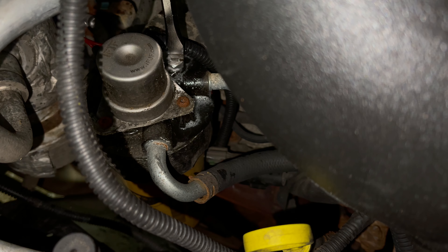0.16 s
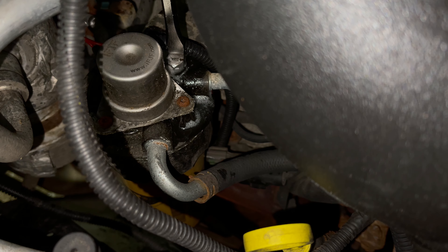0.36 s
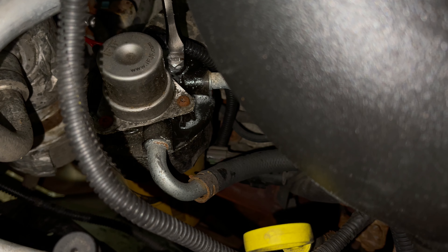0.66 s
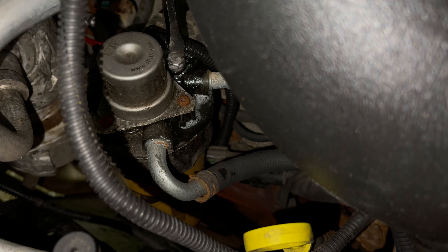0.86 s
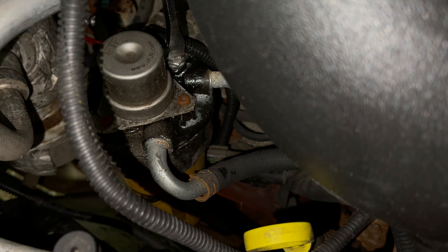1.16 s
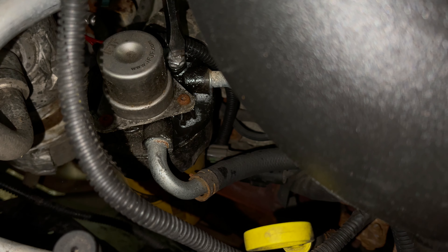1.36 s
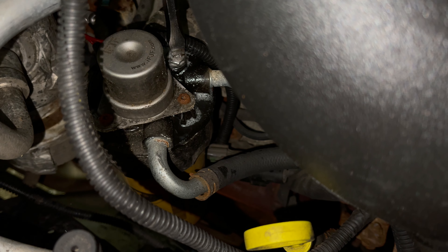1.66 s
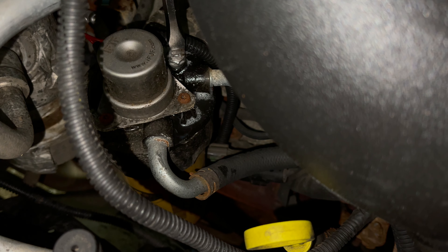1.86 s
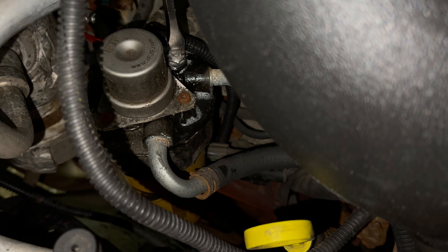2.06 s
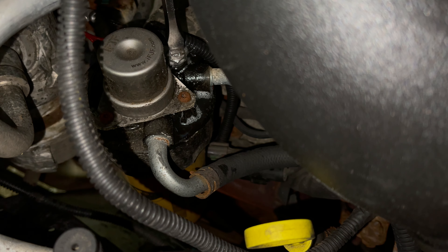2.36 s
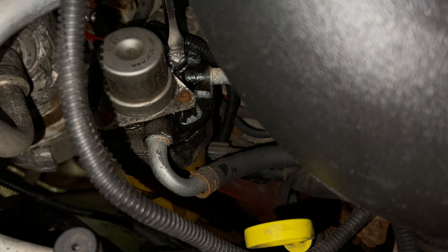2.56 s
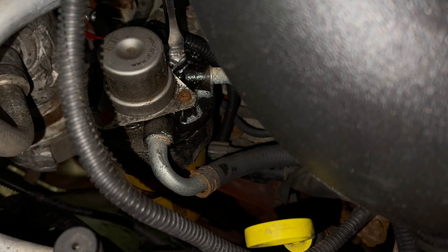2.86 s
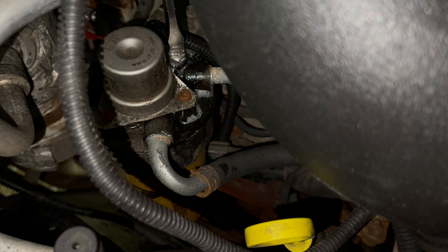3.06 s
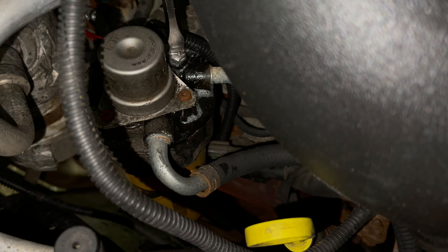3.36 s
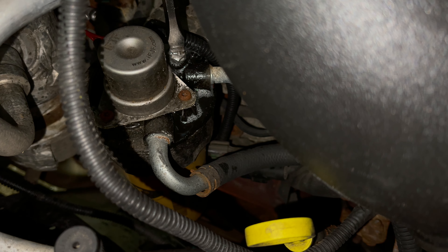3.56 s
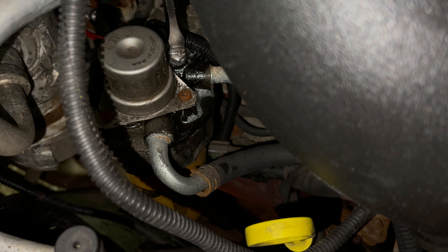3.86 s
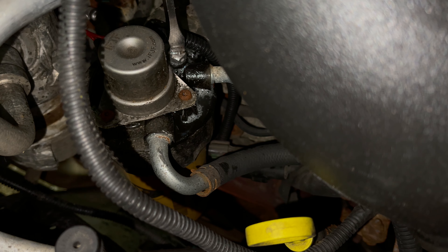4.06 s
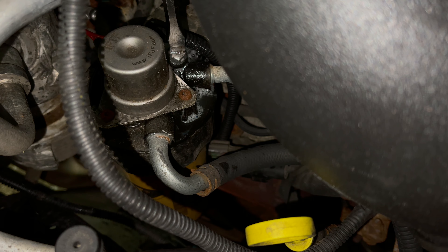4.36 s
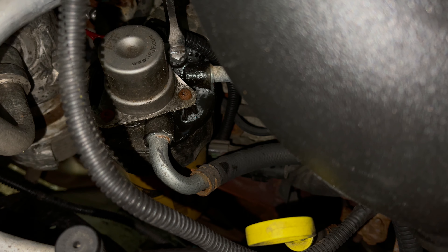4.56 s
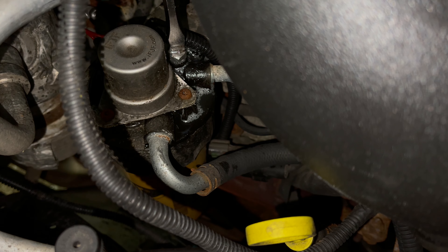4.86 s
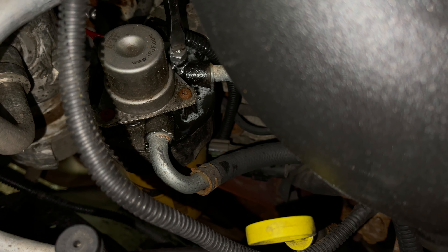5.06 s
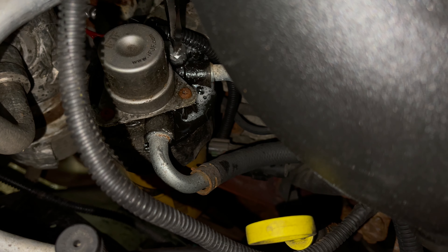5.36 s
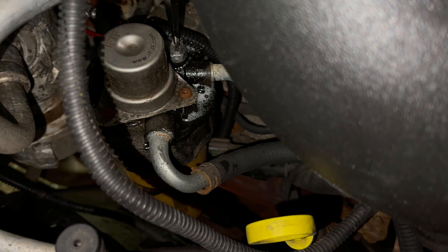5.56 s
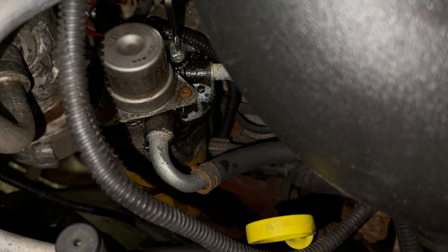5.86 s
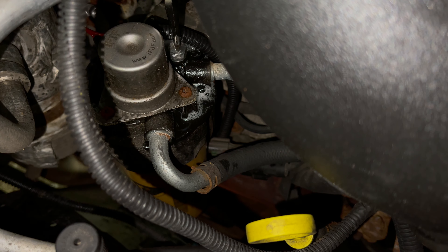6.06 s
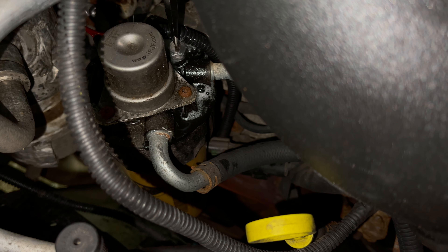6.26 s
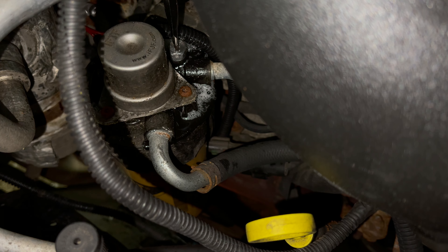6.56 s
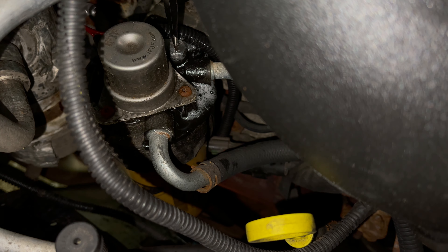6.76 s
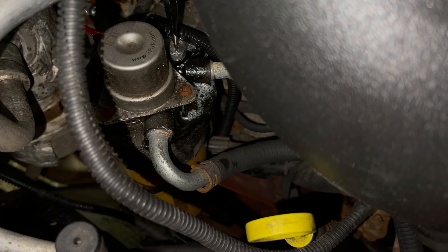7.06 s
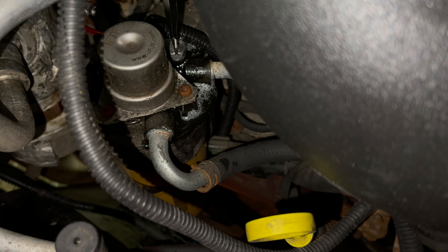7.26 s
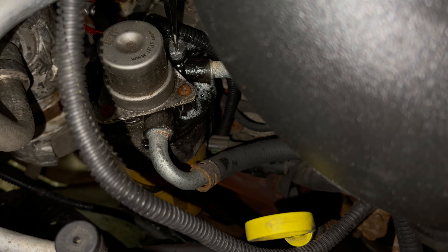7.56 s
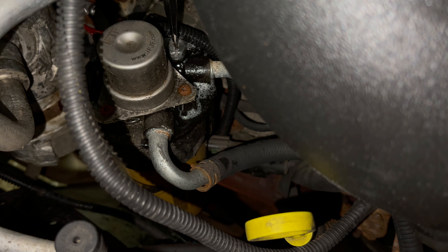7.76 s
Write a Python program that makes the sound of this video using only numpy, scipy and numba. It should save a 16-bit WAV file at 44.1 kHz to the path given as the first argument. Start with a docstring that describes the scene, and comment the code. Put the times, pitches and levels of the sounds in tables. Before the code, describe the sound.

Irregular crackling hisses of air and frothy fuel escape a fitting beside a metal pump, some gliding up to dry hiss, others down to wet squelch. After an early flurry there is a lull with leaking air, then a long busy run of spits, bubbles and hollow hose gulps. The spitting fades to a few ticks over constant pump drone and whine, before a dull knock and slightly faster pump. Near, dry stereo sound under a bonnet.

```python
"""Air spits and hisses at a loosened fuel fitting in an engine bay, over the whine of an electric pump.
Each spit is a noise jet with bubbling spray and splutter, and a squelch whose resonance glides: up from wet
froth to a dry hiss, down as fuel returns. Lone bubbles pop as short bursts; the hose gulps with falling tones.
Once the air is out, the fuel runs quietly with a few ticks. Near the end a knock sounds and the pump,
a set of sines locked to its shaft over casing resonances and rushing noise, speeds up a little."""
import sys
import numpy as np
from scipy import signal
from scipy.fft import rfft, irfft, next_fast_len
from scipy.io import wavfile
from numba import njit

SR = 44100
rng = np.random.default_rng(int(sys.argv[2]) if len(sys.argv) > 2 else 0)


def log_audio(samples):
    """Write samples as a 16-bit WAV file to the path given in sys.argv[1]."""
    # one column per channel
    frames = np.atleast_2d(samples).T
    # limit to full scale, then quantise
    limited = np.clip(frames, -1, 1)
    pcm = np.round(limited * 32767).astype(np.int16)
    wavfile.write(sys.argv[1], SR, pcm)


N = 348875
TIME = np.arange(N) / SR
AGE = TIME[:SR // 5]   # time since a burst began
SIZE = next_fast_len(N + SR // 4)   # room for the reflections
FREQS = np.maximum(np.arange(SIZE // 2 + 1) * SR / SIZE, 1)
CUTOFF_HZ = 15800   # top of the sound


# colours of the three parts of a spit, air jet, spray and splutter: (f/Hz, relative level/dB)
JET_COLOUR = [(6800, -22), (7500, -7), (8200, 1), (8500, -0.5), (9000, 1.5), (9500, 7), (9950, 2.5),
              (10500, 0.5), (10900, -5.5), (11600, -6.5), (12400, -16), (13500, -22), (15500, -30.5),
              (16500, -21)]
SPRAY_COLOUR = [(3700, -19.5), (4300, -11.5), (4800, 2.5), (5150, -4.5), (5600, 0.5), (6300, -1), (7000, 0),
                (7700, -26), (8500, -47)]
SPLUTTER_COLOUR = [(400, -17), (1050, 3.5), (1400, -3), (1700, -22), (2050, 4.5), (2350, -9.5), (2600, 2),
                   (2850, -3.5), (3080, 9), (3220, -2.5), (3360, 10), (3650, -2.5), (4100, -1), (4800, -70)]
# colour that the metal around the gap gives the squelch: (f/Hz, relative level/dB)
SQUELCH_COLOUR = [(1500, 5.5), (2050, 7), (2350, -6), (2850, 2.5), (3080, 7.5), (3220, 0.5), (3360, 2.5),
                  (3700, -5.5), (4100, -6), (4800, 6), (5150, -2), (5600, 1), (7300, -2.5), (8200, 5),
                  (9000, -1), (9600, 13), (10200, 9), (11000, 5), (12500, -3), (13500, 4)]


def fitting():
    """Air hisses out as a jet, tears the fuel into bubbling spray, and splutters and squelches in the wet gap."""
    jet, spray, splutter = outflow()
    bubbling = from_db(-5) * spray * bubbles(cycles=7.3, size_db=10)
    jet = jet * fizz(bursts_per_s=2500, burst_share=0.2, flutter_db=2.5, flutter_rate=62)
    spray = spray * fizz(bursts_per_s=1200, burst_share=0.6, flutter_db=1.5, flutter_rate=20)
    splutter = splutter * fizz(bursts_per_s=600, burst_share=0.42, flutter_db=3.5, flutter_rate=9.5)
    spray = gurgle(spray, path_s=0.00057, swing=0.292, rate=7.0, depth=0.6)
    splutter = gurgle(splutter, path_s=0.000733, swing=0.48, rate=12.6, depth=0.34)
    froth = squelch(q=2.03, waver=0.043, waver_rate=52, attack_s=0.0026, release_s=0.0058)
    mix = from_db(-2.5) * coloured(jet, JET_COLOUR)
    mix += from_db(0.1) * coloured(froth, SQUELCH_COLOUR)
    mix += rfft(bubbling, SIZE)
    mix += from_db(0.54) * coloured(spray, SPRAY_COLOUR)
    mix += from_db(-0.3) * coloured(splutter, SPLUTTER_COLOUR)
    return spread(mix)


# spits of air and frothy fuel; the froth rings low when the gap is wet and high when it is blown clear;
# levels are set before colour and mix:
# (t/s, length/s, air jet level/dB, spray level/dB, squelch level/dB, squelch start f/Hz, squelch end f/Hz)
SPITS = [(0.01, 0.025, -26.5, -41.5, -38, 8600, 7980), (0.033, 0.054, -23.5, -40, -26, 4860, 8600),
         (0.087, 0.015, -18.5, -38, -22, 8900, 9700), (0.117, 0.076, -29, -41, -36.5, 2600, 3680),
         (0.185, 0.054, -26.5, -41.5, -39, 6000, 9900), (0.242, 0.067, -29, -43, -29.5, 9650, 11900),
         (0.375, 0.028, -26, -36, -34, 4540, 10100), (0.401, 0.11, -23.5, -43, -29, 10200, 11500),
         (0.516, 0.11, -27, -42, -35, 9500, 10600), (0.692, 0.066, -46, -48, -36, 2200, 3300),
         (0.745, 0.038, -33, -50, -45, 8000, 9200), (1.312, 0.013, -43, -44, -30, 5960, 8400),
         (1.344, 0.0091, -50, -45, -34.5, 3500, 5500), (1.377, 0.064, -31.5, -52, -36.5, 3200, 9000),
         (2.22, 0.014, -52.0, -57, -41, 3100, 2700), (2.25, 0.018, -42, -43.5, -35.5, 2550, 3900),
         (2.283, 0.076, -30.0, -42.5, -31, 3900, 9700), (2.399, 0.046, -24.5, -39, -29.5, 7300, 5000),
         (2.443, 0.034, -44, -48, -37, 3730, 2830), (2.521, 0.036, -39, -45.5, -35.5, 2920, 5300),
         (2.544, 0.064, -30.5, -43, -32, 8950, 11500), (2.61, 0.013, -23.5, -44, -28, 10500, 11800),
         (2.645, 0.018, -43, -45, -29.5, 3320, 3680), (2.668, 0.01, -33, -38, -41, 3500, 6000),
         (2.692, 0.04, -29.5, -40.5, -34, 3320, 5540), (2.72, 0.049, -28.5, -44, -39, 5000, 3340),
         (2.772, 0.064, -28.5, -43, -36, 8100, 9200), (2.842, 0.047, -22.5, -40, -25, 9900, 7700),
         (2.992, 0.036, -23.5, -39, -30, 10000, 11500), (3.035, 0.06, -23, -42, -25.5, 10600, 7600),
         (3.133, 0.035, -23, -40, -33, 4450, 10000), (3.167, 0.065, -24.5, -43.5, -33, 10200, 7460),
         (3.241, 0.011, -33, -40.5, -33, 4000, 3200), (3.286, 0.028, -31, -39, -32.5, 3100, 3800),
         (3.319, 0.09, -27.5, -45.5, -34, 8300, 11200), (3.416, 0.023, -21, -41.5, -30, 5860, 4560),
         (3.439, 0.042, -30, -43.5, -30.5, 6000, 10600), (3.569, 0.028, -30, -41, -32, 5840, 4670),
         (3.628, 0.031, -27.5, -42, -33.5, 4330, 7050), (3.652, 0.041, -26, -44, -31, 8500, 12000),
         (3.744, 0.0047, -25, -38, -27.5, 5500, 3800), (3.766, 0.034, -22, -40.5, -26.5, 5470, 9800),
         (3.809, 0.02, -22.5, -44.5, -29, 11500, 7000), (3.837, 0.037, -29.5, -41, -34, 5750, 4440),
         (3.893, 0.038, -33, -48.0, -35.5, 2840, 3000), (3.934, 0.024, -26.5, -45, -40, 8000, 8800),
         (4.041, 0.063, -27, -43.5, -32.5, 4400, 6060), (4.185, 0.022, -22.5, -42, -24, 5370, 9500),
         (4.21, 0.026, -24, -40.5, -28, 9500, 6400), (4.252, 0.015, -23.5, -41.5, -35, 5460, 6950),
         (4.301, 0.023, -34, -51, -33.5, 3200, 3250), (4.336, 0.0082, -41, -46, -32.5, 3200, 3320),
         (4.39, 0.043, -34, -46, -37, 3000, 3740), (4.397, 0.016, -40, -36, -31, 7000, 8000),
         (4.449, 0.012, -27.5, -41.5, -29.5, 7800, 5950), (4.5, 0.027, -40, -51, -40, 2700, 2900),
         (4.522, 0.03, -31, -39.5, -32.5, 3000, 3270), (4.608, 0.0062, -35, -40, -43, 3000, 3870),
         (4.651, 0.048, -29.5, -42.5, -33.5, 5240, 4700), (4.893, 0.059, -32, -42.5, -42, 4000, 5000),
         (4.965, 0.031, -29, -41, -36.5, 4530, 5160), (5.022, 0.012, -43, -42, -38, 2960, 3160),
         (5.087, 0.0065, -38, -44, -29.5, 3600, 2800), (5.111, 0.048, -40, -51, -40.5, 3400, 3050),
         (5.149, 0.02, -27.5, -43.5, -53, 6000, 9100), (5.305, 0.0089, -47, -58, -33.5, 2770, 3430),
         (5.309, 0.031, -28, -43, -48, 7500, 10200), (6.124, 0.066, -48, -56, -45, 8200, 8850),
         (6.142, 0.013, -41, -44, -39, 3000, 5970), (6.164, 0.006, -50.5, -58, -39, 2780, 4200),
         (6.189, 0.0054, -51, -43, -41, 3000, 4900)]
# lone air bubbles popping at the gap: (t/s, jet level/dB before the mix)
POPS = [(0.252, -20), (0.329, -21), (0.681, -25.5), (1.757, -24), (2.196, -22), (2.905, -25.5),
        (2.956, -19), (3.118, -19), (3.531, -26.5), (3.545, -27.5), (3.71, -32), (3.73, -19),
        (4.135, -24.5), (4.841, -25.5), (5.032, -29), (5.231, -29.5), (6.149, -30), (6.192, -40)]
# a longer leak of air, rising and sinking: (t/s, base level/dB)
LEAK = [(0.76, -34), (0.785, -33), (0.85, -37.5), (0.97, -49.5), (1.038, -35.5), (1.142, -43), (1.778, -33),
        (1.794, -38), (2.13, -34), (2.19, -41)]
# froth that seeps between the spits: (t/s, base level/dB)
FROTH = [(0, -49.5), (2.5, -48.5), (4.2, -51), (5.1, -59), (5.35, -55), (5.5, -85), (7.9, -84)]
# jet, spray and splutter in dB relative to those base levels
LEAK_PARTS_DB, FROTH_PARTS_DB = (6, -11.5, -23), (2.5, -6, -6)


def outflow():
    """Strength of jet, spray and splutter: seeping froth and the long leak, with spits and pops on top."""
    froth_db, leak_db = in_time(FROTH)[0], in_time(LEAK)[0]
    leaking = (TIME > LEAK[0][0]) & (TIME < LEAK[-1][0])
    power = from_db([froth_db + db for db in FROTH_PARTS_DB]) ** 2
    power += leaking * from_db([leak_db + db for db in LEAK_PARTS_DB]) ** 2
    for s, length, jet_db, spray_db, *_ in SPITS:
        levels_db = (jet_db, spray_db, spray_db - 1)   # splutter just under the spray
        add_burst(power, s, length, levels_db, attack_s=0.0037, release_s=0.0056)
    for s, db in POPS:
        levels_db = (db, db - 18.5, db - 21)
        add_burst(power, s, 0.004, levels_db, attack_s=0.0021, release_s=0.0045)
    return np.sqrt(power)


def add_burst(power, s, length, levels_db, attack_s, release_s):
    """Add the power of one burst to jet, spray and splutter."""
    shape = gate(length, attack_s, release_s)
    at = int(s * SR)
    for part, db in zip(power, levels_db):
        part[at:at + len(AGE)] += (shape * from_db(db)) ** 2


def gate(length, attack_s, release_s):
    """Envelope of one burst: linear attack, hold, exponential release."""
    return np.minimum(AGE / attack_s, 1) * np.exp(-np.maximum(AGE - length, 0) / release_s)


def fizz(bursts_per_s, burst_share, flutter_db, flutter_rate):
    """Three parts of turbulence and bursting bubbles, fluttering together as droplets choke the gap; rms 1."""
    heights = np.exp(0.45 * np.minimum(rng.exponential(1, (3, N)), 4))
    signs = rng.choice([-1, 1], (3, N))
    bursts = rms_one(heights * signs * (rng.random((3, N)) < bursts_per_s / SR))
    turbulence = rng.standard_normal((3, N))
    mix = np.sqrt(burst_share) * bursts + np.sqrt(1 - burst_share) * turbulence
    return rms_one(mix * from_db(flutter_db * drift(flutter_rate)))


def squelch(q, waver, waver_rate, attack_s, release_s):
    """Bursting froth rings in one resonance that glides and wavers through each spit."""
    out = np.zeros((3, N + SR))
    froth = fizz(bursts_per_s=980, burst_share=0.61, flutter_db=2.0, flutter_rate=37)
    unsteady = np.exp(waver * drift(waver_rate))
    for s, length, _, _, db, start_hz, end_hz in SPITS:
        at = int(s * SR) + np.arange(len(AGE))
        glide = start_hz * (end_hz / start_hz) ** np.minimum(AGE / length, 1)
        hz = np.minimum(glide * unsteady[at], CUTOFF_HZ)
        # a narrower band passes less noise, so lift it
        gain = from_db(db) * gate(length, attack_s, release_s) * np.sqrt(2 * q * SR / (np.pi * hz))
        for part, source in zip(out, froth):
            once = moving_resonance(source[at], hz, q)
            part[at] += gain * moving_resonance(once, hz, q)
    return out[:, :N]


@njit
def moving_resonance(x, hz, q):
    """Band-pass with a moving centre and gain 1 on top."""
    out, band, low = np.zeros(len(x)), 0., 0.
    for i in range(len(x)):
        g = np.tan(np.pi * hz[i] / SR)
        v = (band + g * (x[i] - low)) / (1 + g * (g + 1 / q))
        band, low = 2 * v - band, low + 2 * g * v
        out[i] = v / q
    return out


BUBBLES_PER_S, BUBBLE_LOW_HZ, BUBBLE_HIGH_HZ = 420, 1898, 6970


def bubbles(cycles, size_db):
    """Bubbles of many sizes burst in the spray, each ringing briefly at its own pitch; rms 1."""
    out = np.zeros((3, N + SR))
    age = TIME[:SR // 50]
    for when, pitch, size, part in rng.random((int(BUBBLES_PER_S * N / SR), 4)):
        hz = BUBBLE_LOW_HZ * (BUBBLE_HIGH_HZ / BUBBLE_LOW_HZ) ** pitch
        at = int(when * N)
        tone = np.sin(2 * np.pi * hz * age) * np.exp(-age * hz / cycles)
        out[int(part * len(out)), at:at + len(age)] += from_db(size_db * size) * np.sqrt(hz) * tone
    return rms_one(out[:, :N])


def gurgle(parts, path_s, swing, rate, depth):
    """A reflection from the moving fuel surface makes the resonances wander."""
    earlier = TIME - path_s * np.exp(swing * drift(rate))
    reflected = np.array([np.interp(earlier, TIME, part) for part in parts])
    return (parts + depth * reflected) / np.sqrt(1 + depth ** 2)


# gulps in the hose, mostly as a spit is cut off: (t/s, peak level/dB before roughness and hose)
GULPS = [(0.210, -30), (0.309, -28.5), (0.523, -28.5), (0.624, -30), (2.358, -25), (2.439, -31.5),
         (2.704, -28), (2.89, -30.5), (3.047, -33), (3.085, -33), (3.216, -30.5), (3.488, -27),
         (3.594, -28), (3.692, -31.5), (3.826, -31), (3.956, -27.5), (4.094, -29), (4.232, -28.5),
         (4.422, -29), (4.698, -27.5), (7.580, -33)]


def gulps(glide_s, swell_s, lowest_hz, rough_db):
    """An air pocket rings roughly, lower and lower as it grows in the hose."""
    out, age = np.zeros(N + SR), TIME[:SR // 10]
    swell = (age / swell_s * np.exp(1 - age / swell_s)) ** 2
    for (s, db), size in zip(GULPS, rng.standard_normal(len(GULPS))):
        start_hz = 400 * np.exp(0.08 * size)
        pitch = lowest_hz + (start_hz - lowest_hz) * np.exp(-age / glide_s)
        tone = np.sin(2 * np.pi * np.cumsum(pitch) / SR)
        out[int(s * SR) + np.arange(len(age))] += from_db(db) * swell * tone
    return out[:N] * rms_one(from_db(rough_db * drift(126)))


# drops of fuel and small bubbles; the splash level is set before its filter:
# (t/s, ring level/dB, splash level/dB, ring f/Hz, splash centre f/Hz)
DROPS = [(0.125, -38, -46, 1040, 3000), (0.25, -34.5, -53, 997, 3000), (4.782, -42, -33.5, 3020, 6130),
         (5.271, -51, -32.5, 3050, 5000), (5.421, -53, -40, 3370, 8300), (5.6, -62, -45, 3280, 7000),
         (5.780, -50, -41, 3030, 6000), (6.314, -43, -40.5, 3090, 5500), (6.381, -57, -49, 3400, 4500),
         (6.392, -60, -37.5, 8300, 8800), (6.575, -55, -45, 3050, 6000), (6.709, -52, -43, 2500, 4000),
         (6.869, -49, -48, 3000, 6000), (7.393, -49, -52, 2950, 3500), (7.641, -50, -43, 4000, 6500),
         (7.675, -38.5, -48, 2100, 6000), (7.736, -41, -42, 9000, 9000)]


def drops(ring_cycles, splash_s, splash_width_hz):
    """A drop lands with a tiny, broad splash and rings for a few cycles."""
    out, age = np.zeros(N + SR), TIME[:SR // 10]
    for s, ring_db, splash_db, hz, splash_hz in DROPS:
        tone = from_db(ring_db) * np.sin(2 * np.pi * hz * age) * np.exp(-age * hz / ring_cycles)
        splash = from_db(splash_db) * rng.standard_normal(len(age)) * np.exp(-age / splash_s)
        out[int(s * SR) + np.arange(len(age))] += tone + ring(splash, splash_hz, splash_width_hz)
    return out[:N]


# a thin whistle comes and goes during the long leak: (t/s, length/s, level/dB)
WHISTLES = [(0.76, 0.12, -58), (1.13, 0.088, -56), (1.49, 0.11, -56), (1.86, 0.1, -59)]


def whistle(attack_s, release_s):
    """A thin tone of fixed pitch that swells and fades a few times."""
    level = np.zeros(N + SR)
    for s, length, db in WHISTLES:
        level[int(s * SR) + np.arange(len(AGE))] += from_db(db) * gate(length, attack_s, release_s)
    return level[:N] * np.sin(2 * np.pi * 1565 * TIME)


# pump speed: (t/s, turns per s)
SPEED = [(0, 49.9), (.5, 49.92), (.8, 50.12), (1.8, 50.07), (2.5, 49.87), (4.5, 49.77), (5.6, 49.58),
         (6.2, 49.72), (7.57, 49.82), (7.595, 50.72), (7.9, 50.92)]
# pump load: (t/s, casing drone level/dB before the mix, whine level/dB, lift of the motor lines/dB)
PUMP = [(0, -49.5, -51.5, 0), (0.5, -49.5, -53.5, 3.5), (1.9, -50.5, -53, 4.5), (2.4, -50.5, -51.5, 0.5),
        (4.6, -44, -48.5, 2), (5.5, -46, -53, 1.5), (7.54, -47, -50, 1.5), (7.6, -49.5, -45.5, 1),
        (7.9, -46, -45.5, 3)]
# share of the air purged from the line: (t/s, share 0-1)
AIR_GONE = [(2.2, 0.055), (5.0, 0.85)]
# lines of the whine: (multiple of the speed, level/dB re whine, flutter/dB)
WHINE = [(16, 2, -0.5), (17, -12.5, 6)]
# fainter motor lines: (multiple of the speed, level/dB before lift, flutter/dB, change at full air/dB)
MOTOR = [(4, -60.5, 5.5, -1), (20, -67.5, 5.5, -4.5), (30, -64, 1.5, 1.5), (31, -70, 0, -10),
         (36, -68.5, -1, 2), (37, -68, 4, 2.5), (40, -63.5, 2.5, -8.5)]


def pump_lines():
    """The vanes and the commutator sing at multiples of the slightly unsteady shaft speed."""
    turns = np.cumsum(in_time(SPEED)[0] * (1 + 0.00138 * drift(6.5))) / SR
    _, whine_db, lift_db = in_time(PUMP)
    air = 1 - in_time(AIR_GONE)[0]

    def line(multiple, db, flutter_db):
        """A fluttering sine locked to the shaft."""
        flutter = rms_one(from_db(flutter_db * drift(17.0)))
        sine = np.sqrt(2) * np.sin(2 * np.pi * (multiple * turns + rng.random()))   # rms 1
        return from_db(db) * flutter * sine

    whine = sum(line(multiple, whine_db + db, flutter_db) for multiple, db, flutter_db in WHINE)
    motor = sum(line(multiple, lift_db + db + air * air_db, flutter_db)
                for multiple, db, flutter_db, air_db in MOTOR)
    return whine + motor


# resonances of the pump casing: (f/Hz, width/Hz, level/dB re one another)
CASING = [(731.6, 73, 8), (1830, 52, -5.5), (5330, 530, -15.5), (5506, 88, -13.5)]
# colour of the fuel rushing through the pump: (f/Hz, relative level/dB)
RUSH_COLOUR = [(250, -2), (480, 3), (590, 3.5), (880, -1.5), (1150, -7.5), (1600, -7), (2100, -9.5),
               (2500, -12.5), (3500, -20.5), (4800, -15.5), (7000, -29), (9700, -8.5), (11000, -20),
               (13500, -93)]


def pump_noise(churn_db, churn_rate, churn_below_hz, buzz_db, buzz_rate):
    """Churning fuel excites the casing resonances, over a broad rush whose low part heaves unevenly."""
    drone_db = in_time(PUMP)[0]
    modes = sum(from_db(db) * rms_one(1 / (1 + (2 * (FREQS - hz) / width) ** 2))
                for hz, width, db in CASING)
    casing = from_db(drone_db + 2.0) * diffuse(modes)
    noise = casing + from_db(-51.5) * diffuse(colour(RUSH_COLOUR))
    # the lows churn, the high casing ring flutters, the drone between them is left even
    spectrum = rfft(noise, SIZE)
    lows, highs = FREQS < churn_below_hz, FREQS > 4000
    for band, depth_db, rate in ((lows, churn_db, churn_rate), (highs, buzz_db, buzz_rate)):
        heave = rms_one(from_db(depth_db * drift(rate)))
        noise = noise + irfft(spectrum * band, SIZE)[:, :N] * (heave - 1)
    return noise


KNOCK_AT_S, KNOCK_DB, CRACK_DB = 7.578, -25.5, -27.5   # as the pump speeds up; levels before the mix


def knock(decay_s, hz, width_hz, crack_s, crack_hz, crack_width_hz):
    """A dull knock in the pump body with a sharp, broad crack: two dying noise blows, each through a resonance."""
    age = TIME - KNOCK_AT_S
    blow = (age > 0) * rng.standard_normal(N)
    dull = ring(blow * np.exp(-np.abs(age) / decay_s), hz, width_hz)
    crack = ring(blow * np.exp(-np.abs(age) / crack_s), crack_hz, crack_width_hz)
    return from_db(KNOCK_DB) * dull + from_db(CRACK_DB) * crack


# colour of the low rumble around the pump: (f/Hz, relative level/dB)
RUMBLE_COLOUR = [(15, -48), (32, -12), (42, 2), (55, -0.5), (80, -1.5), (115, -2), (160, -5), (200, -13),
                 (280, -13.5), (400, -31.5), (700, -46), (3000, -82)]


def rumble():
    """Steady low noise, nearly alike at both ports."""
    return from_db(-44.5) * diffuse(colour(RUMBLE_COLOUR))


def engine_bay(x, near_db, near_t60, far_db, far_t60):
    """Metal close around the gap colours the sound; farther reflections differ at the two ports."""
    near = 1 + from_db(near_db) * echoes(near_t60)
    far = 1 + from_db(far_db) * np.array([echoes(far_t60), echoes(far_t60)])
    return irfft(rfft(x, SIZE) * near * far, SIZE)[:, :N]


def echoes(t60):
    """Response of a dense, dying cloud of reflections with unit energy."""
    t = TIME[:SR // 4]
    tail = rng.standard_normal(len(t)) * from_db(-60 * t / t60) * (t > .0005)
    return rfft(tail / np.linalg.norm(tail), SIZE)


# the left and right microphone ports: (f/Hz, radians by which left leads), (f/Hz, left-right level/dB)
LEAD = [(100, 0.2), (350, 0.45), (750, 0.85), (1000, 0), (1350, 1.8), (1700, -.5), (3300, 0.65),
        (4200, 0.56), (5400, 0.8), (6600, 0.4), (7400, 1), (8400, 0), (10000, -2.8), (12000, -6.2),
        (15000, -11)]
TILT = [(50, -0.5), (800, 0), (1800, 0), (2300, 5), (3300, 3), (4100, 2), (4800, 4.5), (7200, 5.5),
        (8200, 0.5), (9500, 0)]


def at_ports(spectrum):
    """A spectrum as it reaches the left and right port, each with its own level and phase."""
    sides = np.array([[.5], [-.5]])
    level = from_db(sides * by_hz(TILT))
    response = level / np.sqrt(np.mean(level ** 2, axis=0)) * np.exp(1j * sides * by_hz(LEAD))
    return irfft(spectrum * response, SIZE)[:, :N]


# how alike a source is at the two ports: (f/Hz, likeness 0-1)
LIKENESS = [(100, 1), (400, 0.94), (900, 0.74), (1400, 0.039), (1900, 0.48), (2400, 0.25), (3200, 0.65),
            (4000, 0.55), (7000, 0.9), (8200, 0.89), (11000, 1)]


def spread(spectra):
    """A source from three parts: one heard at both ports, one at the left, one at the right."""
    alike = by_hz(LIKENESS)
    return at_ports(np.sqrt(alike) * spectra[0] + np.sqrt(1 - alike) * spectra[1:])


def diffuse(gain):
    """Steady stereo noise shaped by a gain over frequency."""
    return spread(rfft(rng.standard_normal((3, N)), SIZE) * rms_one(gain))


def coloured(parts, table):
    """Spectra of the parts in the colour of a table, scaled so that white noise keeps its power."""
    return rfft(parts, SIZE) * rms_one(colour(table))


def colour(table):
    """Gain at every frequency from a table in dB."""
    return from_db(by_hz(table))


def by_hz(points):
    """A table read at every frequency, on a log axis."""
    hz, value = np.transpose(points)
    return np.interp(np.log(FREQS), np.log(hz), value)


def in_time(rows):
    """Each column of a curve at every sample."""
    s, *columns = np.transpose(rows)
    return [np.interp(TIME, s, c) for c in columns]


def drift(rate):
    """Smooth chance with spread near 1, changing about rate times a second."""
    grid = np.arange(0, N, 16)
    r = np.exp(-2 * np.pi * rate * grid[1] / SR)
    chance = rng.standard_normal(2 * len(grid))
    slow = signal.lfilter([1], [1, -2 * r, r * r], chance)[len(grid):]   # drop the settling half
    return np.interp(np.arange(N), grid, rms_one(slow))


def ring(x, hz, width_hz):
    """One resonance, with gain 1 on top."""
    r = np.exp(-np.pi * width_hz / SR)
    feedback = [1, -2 * r * np.cos(2 * np.pi * hz / SR), r * r]
    return signal.lfilter([(1 - r * r) / 2, 0, (r * r - 1) / 2], feedback, x + 1e-18)


def from_db(db):
    """Decibels to gain."""
    return 10 ** (np.asarray(db) / 20)


def rms_one(x):
    """Scale to rms 1."""
    return x / np.sqrt(np.mean(x ** 2) + 1e-20)


def scene():
    """Fitting, hose, drops and pump under the bonnet, over a low rumble."""
    gulping = gulps(glide_s=0.0072, swell_s=0.0055, lowest_hz=70, rough_db=2.0)
    # the rubber hose passes mostly the low part of each gulp
    hose = from_db(-5.0) * ring(gulping, hz=190, width_hz=670)
    drips = drops(ring_cycles=9.0, splash_s=0.0049, splash_width_hz=4000)
    thud = knock(decay_s=0.013, hz=700, width_hz=560, crack_s=0.0022, crack_hz=3450, crack_width_hz=1100)
    soft = signal.butter(4, 9000, fs=SR, output="sos")
    small_sounds = signal.sosfilt(soft, drips + hose + thud + 1e-18)
    near_gap = fitting() + at_ports(rfft(small_sounds, SIZE))
    fuel = engine_bay(near_gap, near_db=-10, near_t60=.02, far_db=-14, far_t60=.08)
    tones = at_ports(rfft(pump_lines() + whistle(attack_s=0.023, release_s=0.015), SIZE))
    noise = pump_noise(churn_db=2.0, churn_rate=13.7, churn_below_hz=620, buzz_db=2.0, buzz_rate=110)
    return fuel + tones + noise + rumble()


def record(dry):
    """The top is cut steeply by a low-pass."""
    return signal.sosfilt(signal.ellip(10, .1, 80, CUTOFF_HZ, fs=SR, output="sos"), dry)


dry = scene()
out = record(dry)
log_audio(out)
```